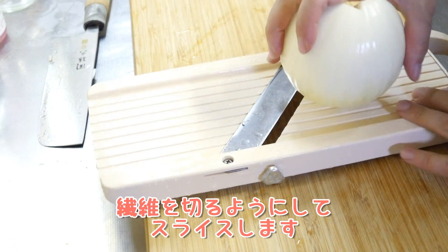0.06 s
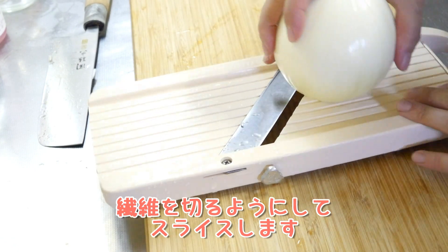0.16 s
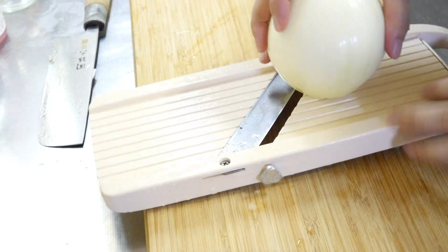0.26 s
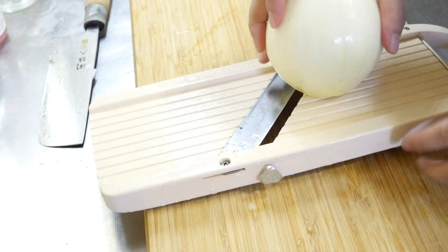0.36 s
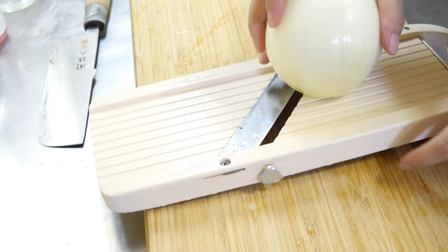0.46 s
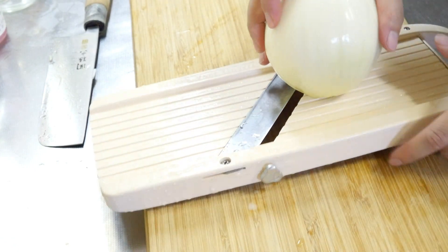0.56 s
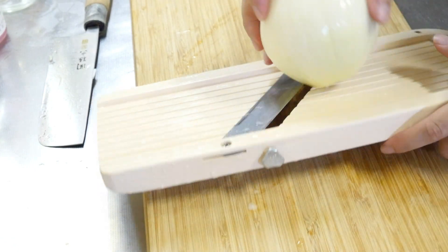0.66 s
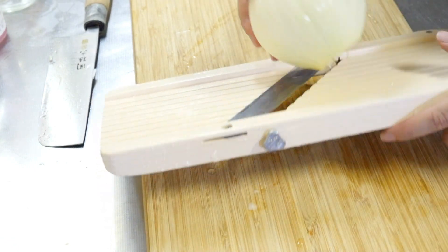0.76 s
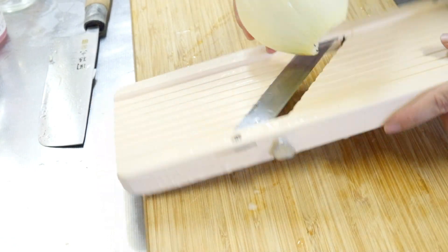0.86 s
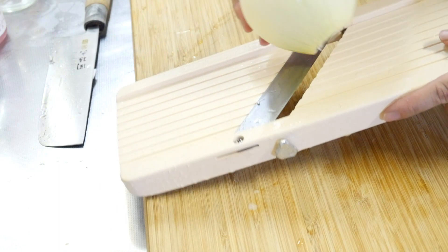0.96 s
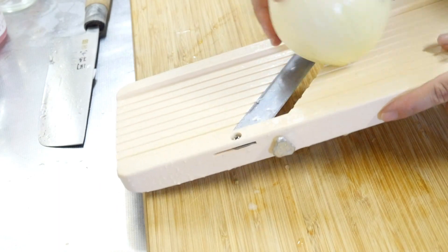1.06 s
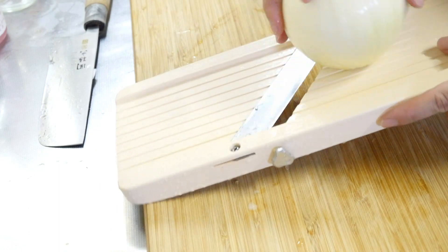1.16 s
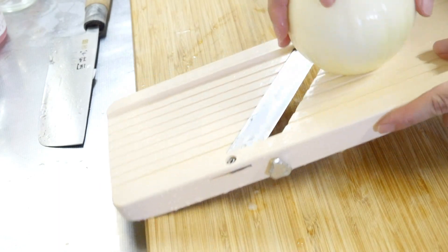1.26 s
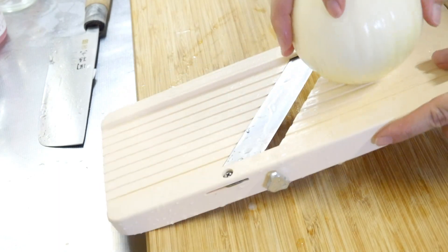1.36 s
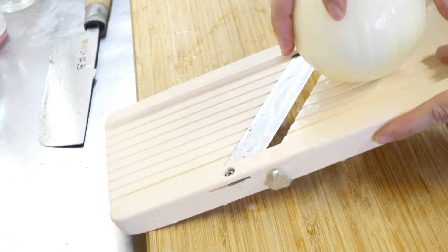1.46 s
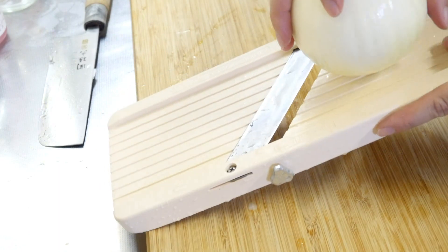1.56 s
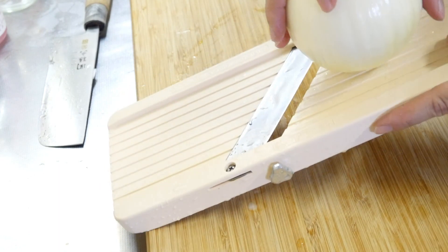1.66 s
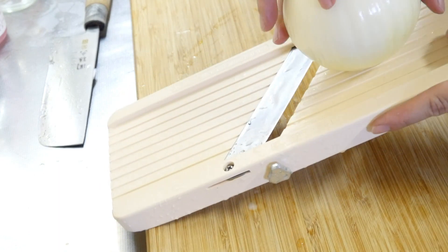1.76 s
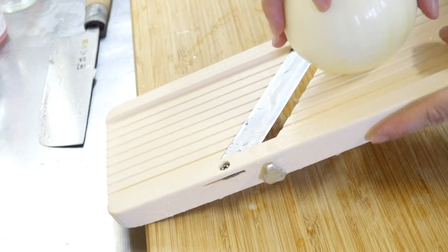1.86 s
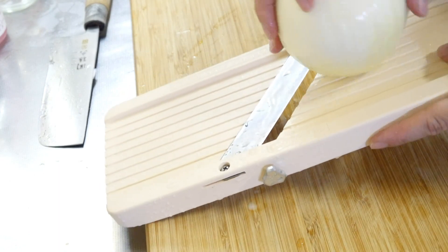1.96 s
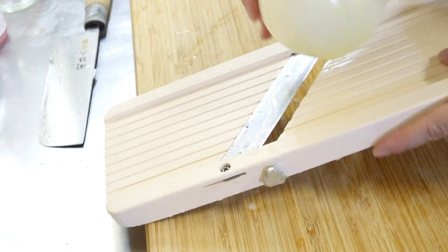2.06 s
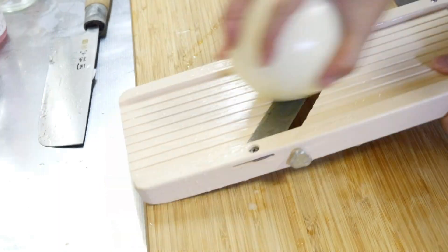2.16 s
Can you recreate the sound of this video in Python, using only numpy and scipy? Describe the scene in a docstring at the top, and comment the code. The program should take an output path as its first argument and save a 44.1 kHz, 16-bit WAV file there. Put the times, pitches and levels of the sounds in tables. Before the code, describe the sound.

Hollow plastic knocks and faint scrapes as a mandoline is shifted on a cutting board.

```python
"""A mandoline on a cutting board

A plastic mandoline is shifted about on a wooden board in a small kitchen, heard from close by.
Impacts excite its modes as the hand bumps it and it knocks and rocks on the board; it ticks under
the fingers, and friction gives a soft slide as an onion is held to its ramp. A wall reflection and
reverberation answer each impact, over a low steady room noise and a faint hiss."""
import sys
import numpy as np
from scipy import signal
from scipy.fft import rfft, irfft, next_fast_len
from scipy.io import wavfile
from scipy.ndimage import map_coordinates

SR = 44100
rng = np.random.default_rng(int(sys.argv[2]) if len(sys.argv) > 2 else 0)


def dump(signal):
    """Clip the signal to [-1, 1] and save it as 16-bit WAV at the path in sys.argv[1]."""
    limited = np.clip(np.atleast_2d(signal).T, -1, 1)
    pcm = np.round(limited * 32767).astype(np.int16)
    wavfile.write(sys.argv[1], SR, pcm)


N = 97020


def amp(db):
    """Amplitude ratio of a level in decibels."""
    return 10 ** (np.asarray(db) / 20)


def unit(x):
    """Normalisation to an rms of 1."""
    return x / np.sqrt(np.mean(x ** 2) + 1e-20)


def along(points, hz):
    """Interpolation of (Hz, value) points on a log-frequency axis."""
    f, v = np.transpose(points)
    return np.interp(np.log(hz + 1), np.log(f + 1), v)


def bell(hz, centre_hz, octaves):
    """Gaussian peak on a log-frequency axis."""
    return np.exp(-.5 * (np.log2((hz + 1) / centre_hz) / octaves) ** 2)


def lowpass(hz, edge_hz, order):
    """Magnitude response that falls 6 dB per octave per order above the edge."""
    return 1 / np.sqrt(1 + ((hz + 1) / edge_hz) ** (2 * order))


def highpass(hz, edge_hz, order):
    """The low-pass response mirrored about its edge."""
    return lowpass(hz, edge_hz, -order)


def colour(x, gain):
    """Minimum-phase filtering: folding the cepstrum makes the response gain(hz) causal."""
    m = 2 * next_fast_len(x.shape[-1] // 2 + 4096)
    magnitude = np.maximum(gain(np.fft.rfftfreq(m, 1 / SR)), 1e-6)
    cepstrum = irfft(np.log(magnitude), m)
    cepstrum[1:m // 2] *= 2
    cepstrum[m // 2 + 1:] = 0
    return irfft(rfft(x, m) * np.exp(rfft(cepstrum)), m)[..., :x.shape[-1]]


def zero_phase(x, gain):
    """Zero-phase filtering: the response gain(hz) adds no delay."""
    m = next_fast_len(x.shape[-1] + SR // 2)
    return irfft(rfft(x, m) * gain(np.fft.rfftfreq(m, 1 / SR)), m)[..., :x.shape[-1]]


def panned(x, balance_db):
    """Intensity panning: a positive level difference balance_db(hz) leans the sound left."""
    return zero_phase(x, lambda hz: amp(balance_db(hz) * np.array([[.5], [-.5]])))


def add(track, start_s, x):
    """Superposition of a sound on the track."""
    i = max(round(start_s * SR), 0)
    track[:, i:i + x.shape[1]] += x[:, :max(N - i, 0)]


# Stereo width. Each row: frequency in Hz, side level relative to mid in dB.
SIDE_LEVEL = [(60, -39), (180, -28), (350, -19.5), (700, -8), (1400, -0.5), (2800, -3.5), (6000, -1.5),
              (14000, -6)]

def stereo_noise(size):
    """Partial coherence: the two channels are alike in the bass and differ in the treble."""
    hz = np.fft.rfftfreq(size, 1 / SR)
    mid, side = rfft(rng.standard_normal((2, size)))
    side = side * amp(along(SIDE_LEVEL, hz))
    return irfft(np.array([mid + side, mid - side]), size)


# Background spectrum of the kitchen. Each row: frequency in Hz, relative level in dB.
ROOM_SPECTRUM = [(25, -23), (60, -17), (115, -6.5), (180, -7.5), (240, -0.5), (310, -9), (480, -4.5),
                 (750, -16), (1400, -22), (3000, -32.5), (5500, -34.5), (7800, -36), (10000, -31.5),
                 (13000, -37.5), (15800, -40)]

def room_noise():
    """Stationary noise with most of its power at low frequencies."""
    noise = colour(stereo_noise(N + SR // 2), lambda hz: amp(along(ROOM_SPECTRUM, hz)))
    return amp(-61) * unit(noise[:, -N:])


# Envelope of the hiss. Each row: time in seconds, level in dB.
HISS_ENVELOPE = [(0, -74.5), (.15, -73.5), (.25, -82), (.9, -74.5), (1.4, -91), (2.2, -102)]

def hiss():
    """Amplitude modulation of a high noise band: it dips, returns and fades away."""
    band = colour(stereo_noise(N), lambda hz: bell(hz, centre_hz=9860, octaves=0.5) + 0.015)
    level_db = np.interp(np.arange(N) / SR, *np.transpose(HISS_ENVELOPE))
    return amp(level_db) * unit(band)


# Reverberation of the kitchen. Each row: frequency in Hz, time to decay by 60 dB in seconds.
REVERB_TIMES = [(100, 0.49), (300, 0.44), (1000, 0.31), (3000, 0.28), (8000, 0.29), (15000, 0.19)]
WALL_DELAY_S, WALL_DB = 0.015, -8

def dense_ring(t60_s, rise_s, room_db):
    """Overlapping modes act as decaying noise; a wall reflection and reverberation follow."""
    t = np.arange(SR // 2) / SR
    direct = stereo_noise(len(t)) * amp(-60 * t / t60_s) * (1 - np.exp(-t / rise_s))
    hz, when, spectra = signal.stft(stereo_noise(len(t)), SR, nperseg=256)
    decay = amp(-60 * when / along(REVERB_TIMES, hz)[:, None])
    tail = signal.istft(spectra * decay, SR, nperseg=256)[1][:, :len(t)]
    tail = tail * (1 - np.exp(-t / 0.00074))
    echo = np.pad(direct, ((0, 0), (round(WALL_DELAY_S * SR), 0)))[:, :len(t)]
    return direct + amp(WALL_DB) * echo + amp(room_db) * unit(tail) * direct.std()


# Modes of the mandoline on the board. Each row: frequency in Hz, time to decay by 60 dB in seconds,
# then relative levels in dB when struck at the front, the middle and the rear.
BODY_MODES = [(96.7, 0.26, -15.5, -19.5, -5.5), (170.8, 0.35, -13.5, -25, -16), (209, 0.12, 4, -5, 0.5),
              (270.3, 0.33, -11, -33, -14.5), (369.2, 0.077, -1.5, -3, 0), (428.9, 0.086, -3, -7, -0.5),
              (761.6, 0.064, -8.5, -5.5, -5), (827, 0.046, 2.5, -0.5, -27), (1101, 0.044, -29, 1.5, 4.5),
              (1560, 0.023, 2, -1, -14), (1930, 0.05, -2, -6, -22), (2202, 0.041, -7.5, -8, -2),
              (2770, 0.032, -16, -5.5, -11), (3950, 0.043, -14, -5, -21)]
# Dense resonances of the frame. Each row: frequency in Hz, relative level in dB.
FRAME_SPECTRUM = [(30, -42.5), (70, -1.5), (130, -1), (220, 3), (400, 0), (530, -3), (720, 2.5), (1300, -2),
                  (2100, -0.5), (4000, -5), (7500, -8), (15000, -15)]
MODE_RISE_CYCLES, MODE_SCATTER_DB, MODE_ROOM_T60_S = 1.7, 2, 0.32

def body_response(spot):
    """Modal superposition: the point of impact sets how strongly each mode is excited."""
    t = np.arange(SR // 2) / SR
    column = ("front", "middle", "rear").index(spot)
    modes = 0
    for hz, t60, *levels_db in BODY_MODES:
        phase = 2 * np.pi * hz * t
        side = amp(along(SIDE_LEVEL, hz)) * rng.choice([-1, 1]) * np.array([[1], [-1]])
        db = levels_db[column] + MODE_SCATTER_DB * rng.normal()
        envelope = amp(db - 60 * t / t60) * (1 - np.exp(-t * hz / MODE_RISE_CYCLES))
        modes = modes + envelope * (np.sin(phase) + side * np.cos(phase))
    room = unit(stereo_noise(len(t)) * amp(-60 * t / MODE_ROOM_T60_S)) / np.sqrt(len(t))
    reverb = signal.fftconvolve(modes.mean(axis=0)[None], room, axes=1)[:, :len(t)]
    ring = dense_ring(t60_s=0.043, rise_s=0.00076, room_db=-1)
    frame = colour(ring, lambda hz: amp(along(FRAME_SPECTRUM, hz)))
    return amp(0.5) * (modes + amp(-4.5) * reverb) + amp(10) * frame


# Bumps of the hand on the frame. Each row: start in seconds, gain in dB, contact cut-off in Hz.
HAND_BUMPS = [(0.238, -51, 2440), (.521, -40.5, 1024), (0.659, -48, 410), (.752, -46.5, 1090)]
BASS_ORDER = 1.97

def hand_bumps():
    """A soft contact is a low-pass excitation; a light touch also barely moves the board in the bass."""
    out = np.zeros((2, N))
    for start_s, db, contact_hz in HAND_BUMPS:
        force = lambda hz: lowpass(hz, contact_hz, 5.2) * highpass(hz, 90, BASS_ORDER)
        add(out, start_s, amp(db) * colour(body_response("middle"), force))
    return out


# Landings of the frame on the board. Each row: start in seconds, spot that lands, gain in dB,
# contact cut-off in Hz, its filter order, bass edge in Hz, left-right balance in dB.
BOARD_KNOCKS = [(0.245, "front", -22, 2060, 3.18, 196, 2.5), (0.2569, "front", -30, 1350, 3.9, 130, -6),
                (0.3001, "front", -29.5, 2060, 4.04, 128, 2), (0.336, "front", -34, 1790, 5, 131, -2.5),
                (0.9302, "middle", -24, 3980, 3.8, 96.5, 0.5), (0.9509, "middle", -28, 4400, 3.6, 80, -1),
                (1.1891, "rear", -25.5, 1445, 2.01, 109, 0.5), (1.2017, "rear", -33, 750, 3.7, 70, 6),
                (1.2161, "rear", -33, 1190, 2.2, 51.7, -2)]

def board_knocks():
    """Impact excitation: a harder contact has a wider force spectrum, so the hollow ring is brighter."""
    out = np.zeros((2, N))
    for start_s, spot, db, contact_hz, order, bass_hz, pan_db in BOARD_KNOCKS:
        force = lambda hz: lowpass(hz, contact_hz, order) * highpass(hz, bass_hz, BASS_ORDER)
        balance_db = lambda hz: pan_db * highpass(hz, 700, 1.5)  # the bass stays central
        knock = colour(body_response(spot), force)
        add(out, start_s, amp(db) * panned(knock, balance_db))
    return out


# Ticks of the plastic. Each row: start in seconds, relative level in dB, low and high edges in Hz.
PLASTIC_CLICKS = [(0.2455, -50.5, 3500, 9900), (0.5187, -44.5, 494, 12600), (0.653, -48.5, 4030, 14600),
                  (.752, -43.5, 800, 4700), (0.809, -54.5, 880, 2850), (0.934, -29, 2400, 11200),
                  (0.9463, -30.5, 2400, 12500), (0.955, -36.5, 3000, 11700), (1.131, -50, 5500, 6500)]
# Spectrum common to the ticks. Each row: frequency in Hz, relative level in dB.
CLICK_SPECTRUM = [(300, 4.5), (1000, 8), (2500, 1), (4000, -5.5), (5500, -3), (7600, -3.5), (10000, 0.5),
                  (12500, -7), (15500, -15)]

def plastic_clicks():
    """Broadband transients: hard plastic is excited abruptly and its ring is quickly damped."""
    out = np.zeros((2, N))
    for start_s, db, low_hz, high_hz in PLASTIC_CLICKS:
        band = lambda hz: highpass(hz, low_hz, 0.74) * lowpass(hz, high_hz, 2.0)
        snap = dense_ring(t60_s=0.015, rise_s=0.00017, room_db=-0.5)
        click = colour(snap, lambda hz: amp(along(CLICK_SPECTRUM, hz)) * band(hz))
        add(out, start_s, amp(db + 9.5) * click)
    return out


# Slides of onion and frame. Each row: peak time, rise and fall in seconds, level in dB, gain at the
# ramp resonance in dB, its width in octaves, treble gain in dB.
SLIDE_STROKES = [(.39, 0.084, 0.067, -63, -11, 0.26, -0.5), (.7, 0.053, 0.033, -64, -5, 0.23, 9),
                 (.86, 0.011, 0.18, -63.5, 1.5, 0.17, -4), (1.24, 0.029, 0.037, -51, 9, .1, -9.5),
                 (1.316, 0.027, 0.054, -51, 8, 0.26, 8.5), (1.49, 0.14, 0.15, -69, -1.5, 0.31, -11.5),
                 (1.86, 0.054, 0.051, -65, 12, 0.088, 2.5), (2.2, 0.027, .03, -68, 3, 0.14, 0)]
# Spectrum of the friction. Each row: frequency in Hz, relative level in dB.
FRICTION_SPECTRUM = [(100, -1.5), (600, 9), (1400, 2.5), (3000, 2), (4500, -4.5), (7500, -10), (10500, -5),
                     (14200, -14.5), (16000, -28)]
RAMP_HZ, GRAIN_DB, GRAINS_PER_S = 2230, 1.5, 200

def slides():
    """Sliding friction: grainy noise swells and fades with each move, coloured by the ramp's resonance."""
    out, t = np.zeros((2, N)), np.arange(N) / SR
    for peak_s, rise_s, fall_s, db, ramp_db, octaves, treble_db in SLIDE_STROKES:
        grain = map_coordinates(rng.standard_normal(N // 10), [t * GRAINS_PER_S], order=1)
        tone = lambda hz: amp(along(FRICTION_SPECTRUM, hz)
                              + ramp_db * bell(hz, RAMP_HZ, octaves)
                              + treble_db * highpass(hz, 5500, 0.18))
        friction = unit(colour(stereo_noise(N), tone) * amp(GRAIN_DB * grain))
        swell = np.exp(-.5 * ((t - peak_s) / np.where(t < peak_s, rise_s, fall_s)) ** 2)
        out += amp(db) * friction * swell
    return out


# Balance of the handling sounds. Each row: frequency in Hz, left minus right level in dB.
HANDLING_BALANCE = [(300, -0.5), (700, -2.5), (1300, -1), (2400, 2), (4400, 0), (8000, -0.5), (15000, -1)]

def scene():
    """Superposition: the handling sounds, panned slightly by frequency, add to the background."""
    handling = board_knocks() + hand_bumps() + plastic_clicks() + slides()
    return panned(handling, lambda hz: along(HANDLING_BALANCE, hz)) + room_noise() + hiss()


def record(dry):
    """Band limiting: an ideal low-pass removes the highest treble."""
    return zero_phase(dry, lambda hz: hz < 15800)


dry = scene()
out = record(dry)
dump(out)
```